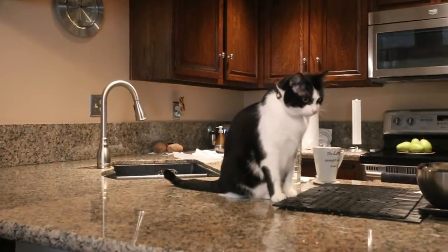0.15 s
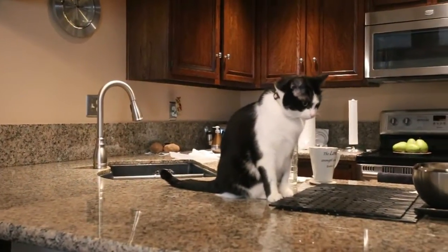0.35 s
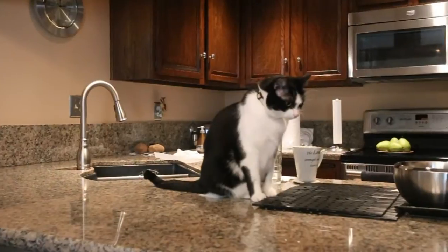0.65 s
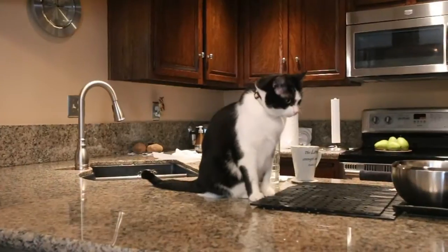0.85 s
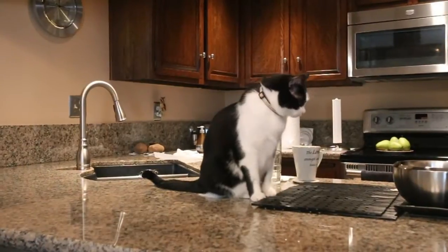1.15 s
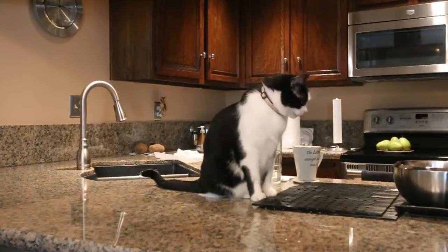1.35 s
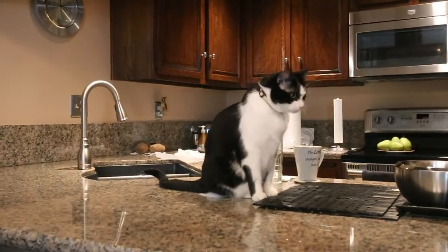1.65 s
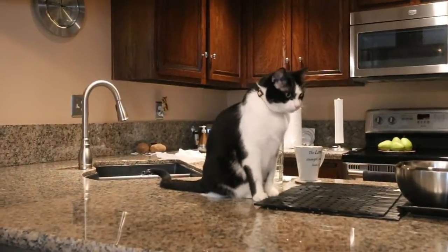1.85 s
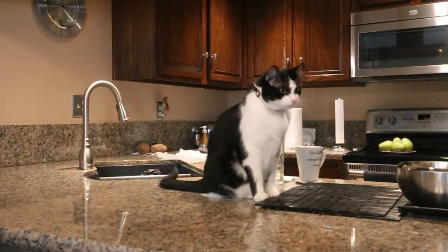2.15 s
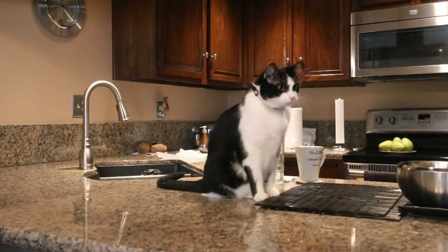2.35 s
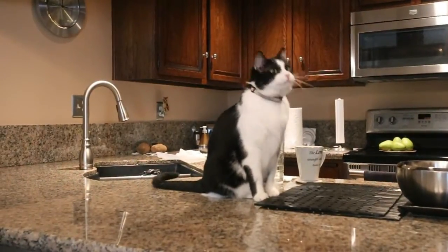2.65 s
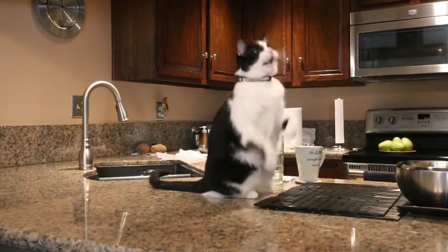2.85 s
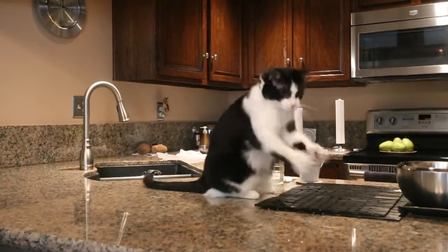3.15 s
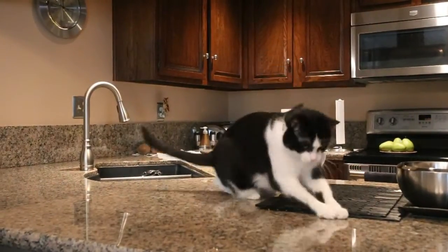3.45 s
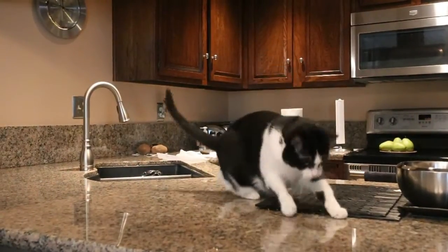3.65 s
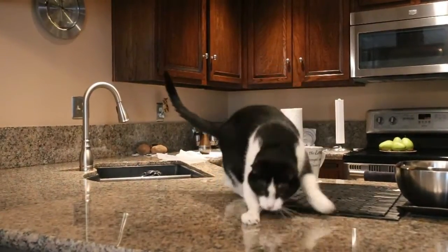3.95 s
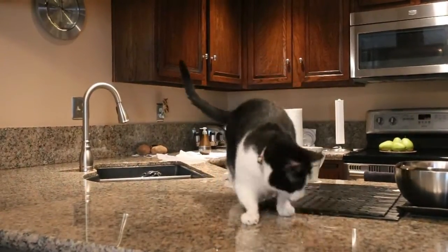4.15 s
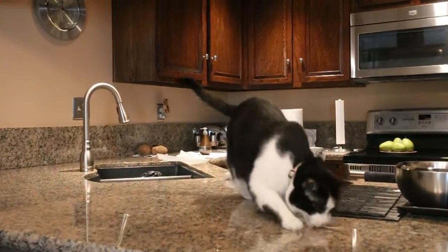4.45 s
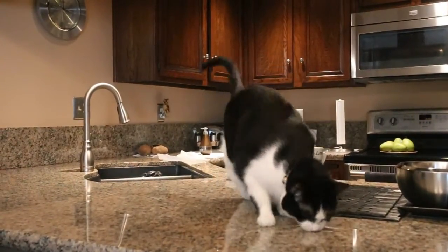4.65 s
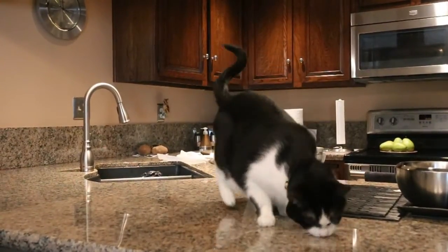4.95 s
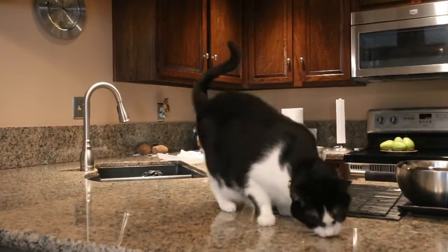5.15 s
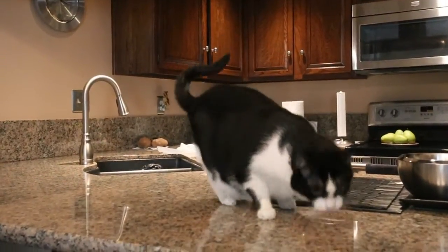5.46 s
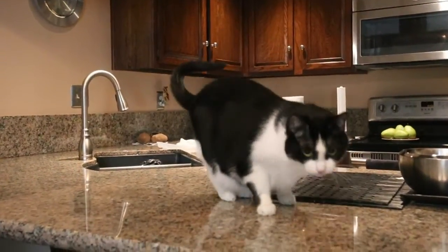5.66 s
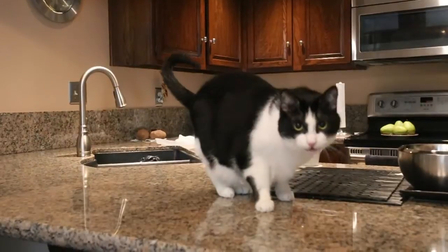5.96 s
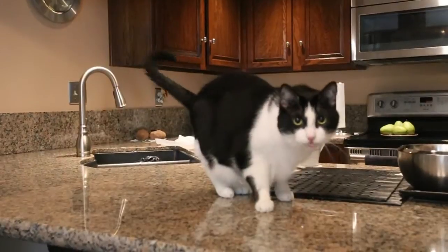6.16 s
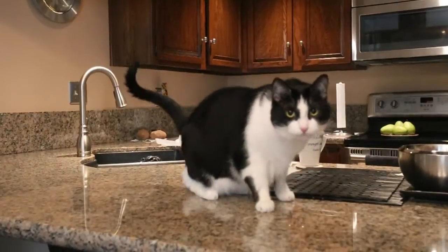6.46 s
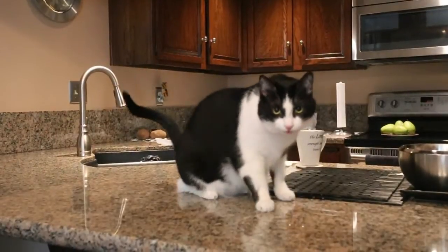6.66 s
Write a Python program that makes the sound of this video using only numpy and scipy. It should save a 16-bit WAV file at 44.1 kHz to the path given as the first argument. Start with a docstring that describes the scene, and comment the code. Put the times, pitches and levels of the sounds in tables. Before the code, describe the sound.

Distant, roomy clock ticks and tocks alternate steadily throughout. For three seconds almost nothing else is heard except faint brushing. Then a hard treat snaps on stone, sharp and far louder than everything, followed by tiny skitters and a second weaker click. Paws dully crunch a plastic mat, a low hum swells gently, and a collar tag tinks faintly. Close, dry counter sounds in a lively kitchen, with soft microphone hiss.

```python
"""Quiet kitchen: a pendulum wall clock ticks in a far corner, its struck case heard mostly by reflection.
On a stone counter, heard direct, a cat bats a hard treat: modes ring in two sharp clicks, short noise skitters.
The cat steps on a plastic mat, which crunches, and its collar tag tinks; both are banks of dying sines.
Shaped noise makes the soft brushes, room tone and microphone hiss; a low drone wavers and swells beneath.
"""
import sys
import numpy as np
from scipy import signal
from scipy.fft import rfft, irfft
from scipy.io import wavfile
from scipy.ndimage import uniform_filter1d

SR = 44100
rng = np.random.default_rng(int(sys.argv[2]) if len(sys.argv) > 2 else 0)


def convert_level_to_amplitude(level_db):
    """Map a level in decibels to its linear amplitude factor."""
    exponent = np.asarray(level_db, float) / 20
    return 10 ** exponent


def put_to_file(sound):
    """Save the sound as 16-bit audio at rate SR, in the file named by the first command-line argument."""
    columns = np.atleast_2d(sound).T  # one column per channel
    safe = np.clip(columns, -1, 1)
    whole_steps = np.round(safe * 32767)
    wavfile.write(sys.argv[1], SR, whole_steps.astype(np.int16))


N = 300756  # length in samples


def evened(x):
    """Scales to rms 1."""
    return x / np.sqrt(np.mean(x ** 2) + 1e-20)


def read(points, hz):
    """Reads a table on a log-frequency axis."""
    f, value = np.transpose(points)
    return np.interp(np.log(hz + 1), np.log(f + 1), value)


def add(mix, start_s, sound):
    """Mixes a sound in at start_s seconds."""
    part = mix[round(start_s * SR):][:len(sound)]
    part += sound[:len(part)]


def scaled_to_peak(sound, peak_db):
    """Scales a sound to the given peak level."""
    return convert_level_to_amplitude(peak_db) * sound / abs(sound).max()


def echoes(x, table):
    """Delayed copies, one for each path off a nearby surface."""
    return sum(convert_level_to_amplitude(level_db) * np.roll(x, round(delay_s * SR)) for delay_s, level_db in table)


def ring(hz, level_db, t60_s, rise_s):
    """Dying sines, one per mode, after a contact whose push builds up over rise_s."""
    t = np.arange(SR // 4)[:, None] / SR
    modes = convert_level_to_amplitude(level_db - 60 * t / t60_s) * np.sin(2 * np.pi * hz * t)
    signs = (-1.) ** np.arange(len(hz))  # neighbours start opposite, which fills the gaps between them
    return modes @ signs * (1 - np.exp(-t[:, 0] / rise_s))


def blows(events, modes, rise_s):
    """Each blow rings the modes, duller or brighter by its tilt, and more or less damped."""
    hz, level_db, t60_s = np.transpose(modes)
    octaves = np.log2(hz / hz[np.argmax(level_db)])  # from the strongest mode
    out = np.zeros(N)
    for start_s, peak_db, tilt_db, free_share in events:
        sound = ring(hz, level_db + tilt_db * octaves, t60_s * free_share, rise_s)
        add(out, start_s, scaled_to_peak(sound, peak_db))
    return out


def band_noise(size, hz, width_hz):
    """Slow complex noise shifted up to hz."""
    r = np.exp(-np.pi * width_hz / SR)
    white = rng.standard_normal((size, 2)) @ [1, 1j]
    slow = signal.lfilter([1], [1, -2 * r, r * r], white)
    carrier = np.exp(2j * np.pi * hz * np.arange(size) / SR)
    return evened((slow * carrier).real)


# how long the kitchen rings on: pitch_hz, t60_s
KITCHEN = [(500, 0.46), (2000, 0.6), (5500, 0.43), (14500, 0.25)]


def kitchen(x, gap_s, build_s):
    """Random reflections start after a gap, build up, and die band by band."""
    hz, t, z = signal.stft(rng.standard_normal(SR), SR, nperseg=256)
    fade = convert_level_to_amplitude(-60 * t / read(KITCHEN, hz)[:, None])
    tail = signal.istft(z * fade, SR, nperseg=256)[1]
    tail = tail * (1 - np.exp(-np.arange(len(tail)) / SR / build_s))
    tail = np.concatenate([np.zeros(round(gap_s * SR)), tail / np.linalg.norm(tail)])
    return signal.oaconvolve(x, tail)[:N]


# spectrum of room tone and microphone hiss, shape only: pitch_hz, level_db (per Hz, relative)
AIR = [(15, -42), (25, -12), (45, -12), (62, -1.5), (84, -11), (114, -0.5), (200, -6), (330, -8),
       (800, -12), (2100, -16), (4200, -21), (5400, -28.5), (7500, -28.5), (12500, -25), (16000, -28)]


def air():
    """Steady room tone and microphone hiss: white noise shaped in frequency."""
    shape = convert_level_to_amplitude(read(AIR, np.fft.rfftfreq(N, 1 / SR)))
    tone = irfft(rfft(rng.standard_normal(N)) * shape, N)
    return convert_level_to_amplitude(-57) * evened(tone)  # rms dB


DRONE_HZ, DRONE_WAVER_HZ = 110.2, 6.01  # centre pitch; rms waver
DRONE_DB, DRONE_FLUTTER_DB = -76.5, 3  # rms between swells, before flutter; most flutter either way
# times when the low drone swells: middle_s, length_s, rise_db
SWELLS = [(0.988, 0.18, 10), (3.805, 0.85, 13.5), (4.623, 0.24, 11), (5.081, 0.3, 18), (5.31, 0.15, 21),
          (5.508, 0.13, 16), (5.932, 0.78, 16)]


def drone():
    """A low sine that wavers in pitch, flutters in level and swells now and then."""
    t = np.arange(N) / SR
    bumps = [rise_db * np.clip(1 - (2 * (t - middle_s) / length_s) ** 4, 0, 1)
             for middle_s, length_s, rise_db in SWELLS]
    waver = evened(uniform_filter1d(rng.standard_normal(N), size=4000))
    flutter = evened(uniform_filter1d(rng.standard_normal(N), size=4000))
    level_db = DRONE_DB + np.max(bumps, axis=0) + DRONE_FLUTTER_DB * np.tanh(flutter)
    phase = 2 * np.pi * np.cumsum(DRONE_HZ + DRONE_WAVER_HZ * waver) / SR
    return convert_level_to_amplitude(level_db) * np.sqrt(2) * np.sin(phase)


FIRST_TICK_S, SWING_S, TOCK_AFTER_S = .0952, 1.3196, .639  # the escapement limps: the tock comes early
MODE_SCATTER_DB, PITCH_SCATTER = 1.5, .002  # rms per mode and beat; pitch as a share
# clock case modes, levels before the room: pitch_hz, tick_db, tock_db, t60_s
CASE = [(1605, -51.5, -54, 0.013), (1802, -56, -55.5, 0.041), (1920, -49, -52, .008),
        (2030, -52.5, -59, 0.0304), (2230, -55.5, -60, .008), (2420, -57.5, -54, 0.035),
        (3393, -57.5, -56, 0.017), (3583, -59.5, -57, 0.041), (4930, -78, -58.5, 0.014),
        (5225, -74, -59, 0.058), (5950, -67, -66, 0.013), (7600, -65, -61, 0.012)]
# no two beats fall quite alike, tick and tock in turn: level_db (added to the case modes)
STRENGTHS_DB = [-2, -1.8, -1.5, -0.55, -1, .1, 0.91, 1.3, -0.37, 1.5, .4]
# the clock hangs in a corner, direct sound and first strong reflections: delay_s, level_db
CORNER = [(0, -10), (.0047, -2.5), (.0083, 0.5), (0.0118, -4), (0.0172, 2.5), (.0194, -10), (.0277, -7.5),
          (0.031, -1), (.041, -20), (0.05, -6)]


def clock():
    """Ticks and tocks ring the same case modes with other strengths; reflections outweigh the direct path."""
    hz, tick_db, tock_db, t60_s = np.transpose(CASE)
    out = np.zeros(N)
    for beat, strength_db in enumerate(STRENGTHS_DB):
        is_tock = beat % 2
        start_s = FIRST_TICK_S + beat // 2 * SWING_S + is_tock * TOCK_AFTER_S
        level_scatter, pitch_scatter = rng.standard_normal((2, len(hz)))
        level_db = strength_db + (tock_db if is_tock else tick_db) + MODE_SCATTER_DB * level_scatter
        add(out, start_s, ring(hz * (1 + PITCH_SCATTER * pitch_scatter), level_db, t60_s, 0.00026))
    return convert_level_to_amplitude(5.5) * (echoes(out, CORNER) + convert_level_to_amplitude(-0.5) * kitchen(out, .02, 0.011))


# soft brushes and thuds: start_s, length_s, level_db (rms), centre_hz, width_hz
BRUSHES = [(.21, 0.062, -67, 4550, 4000), (1.14, 0.087, -63.5, 1495, 3040), (2.82, 0.21, -60.5, 1295, 1200),
           (2.852, 0.17, -60, 597, 700), (2.86, 0.15, -69.5, 8940, 4000), (3.337, 0.11, -50, 1800, 3000),
           (3.885, 0.1, -62.5, 491, 129), (3.885, 0.078, -55, 2520, 6000), (3.699, .1, -60, 3015, 4130),
           (4.69, 0.13, -59, 800, 930), (5.02, 0.64, -61, 330, 252), (5.15, 0.14, -63.5, 1187, 120),
           (5.26, 0.056, -64, 74.5, 40), (5.27, 0.078, -54.5, 298.4, 407), (5.274, 0.041, -56, 1300, 700),
           (5.943, .05, -56, 2484, 1510), (5.97, 0.16, -62, 1543, 350), (6.68, 0.21, -68.5, 1437, 299)]


def brushes():
    """Puffs of band noise with a quick start and a slower end."""
    out = np.zeros(N)
    for start_s, length_s, level_db, centre_hz, width_hz in BRUSHES:
        u = np.linspace(0, 1, round(length_s * SR))
        puff = evened(u ** 0.2 * (1 - u))
        add(out, start_s, convert_level_to_amplitude(level_db) * puff * band_noise(len(u), centre_hz, width_hz))
    return out


GRIT_T60_S = .0015
CLICK_WIDTH_SHARE, CLICK_SNAP_DB = 0.63, -20.5  # resonance width over its centre; uncoloured snap under it
# small dry clicks of treat, claws and teeth: start_s, peak_db, centre_hz
CLICKS = [(1.15, -48, 3600), (1.432, -49, 5500), (1.478, -49, 7550), (2.223, -49, 5500), (2.892, -39, 8600),
          (3.015, -37.5, 10800), (3.34, -22, 3600), (3.477, -37, 4200), (3.702, -40, 8900),
          (3.713, -40, 4040), (3.727, -42.5, 4000), (3.763, -40, 10200), (3.77, -43, 9000),
          (3.822, -42, 9050), (3.882, -30.5, 11500), (4.021, -41, 9400), (4.08, -38, 11000),
          (4.25, -38, 9700), (4.302, -42, 9900), (4.340, -41.5, 9600), (4.63, -51, 6080),
          (4.683, -39, 6600), (4.723, -41, 7400), (4.741, -44, 8000), (4.909, -47, 8160),
          (4.944, -39.5, 8100), (5.002, -39, 8200), (5.005, -34, 8060), (5.008, -36, 8800),
          (5.121, -36.5, 9100), (5.124, -39, 4970), (5.138, -41, 9500), (5.171, -38, 6100),
          (5.234, -39, 8700), (5.275, -50, 5000), (5.407, -47, 8000), (5.433, -40, 12000),
          (5.949, -48, 7000), (5.990, -43, 9500), (6.399, -50, 8000), (6.67, -44, 8010)]


def clicks():
    """Each is a quickly dying burst of noise, coloured by one broad resonance."""
    out, t = np.zeros(N), np.arange(256) / SR
    for start_s, peak_db, hz in CLICKS:
        grit = rng.standard_normal(256) * convert_level_to_amplitude(-60 * t / GRIT_T60_S)
        snap = signal.lfilter([1, 0, -1], [1], grit)
        r = np.exp(-np.pi * CLICK_WIDTH_SHARE * hz / SR)
        pole = [1, -2 * r * np.cos(2 * np.pi * hz / SR), r * r]
        coloured = signal.lfilter([1], np.convolve(pole, pole), snap)
        sound = evened(coloured) + convert_level_to_amplitude(CLICK_SNAP_DB) * evened(snap)
        add(out, start_s, scaled_to_peak(sound, peak_db))
    return out


# modes of a small hard part, perhaps the collar buckle: pitch_hz, level_db (relative), t60_s
BUCKLE = [(4300, -3, 0.0049), (8300, -5, .002)]
# its taps: start_s, peak_db, tilt_db (per octave), free_share (of the ring time)
TAPS = [(3.102, -41.5, -3, 1), (4.398, -44.5, 6, 1), (6.385, -44.5, -4, 1)]


def buckle_taps():
    """Two short modes of a small hard part ring at each tap."""
    return blows(TAPS, BUCKLE, .0001)


CONTACT_S, CONTACT_DB = .00005, -11  # the landing's own short push, against the peak of the ring
# hard treat on stone, modes: pitch_hz, flat_db (relative), edge_db (relative), t60_s
TREAT = [(2430, -25, -17, 0.0083), (2880, -22.5, -15.5, 0.0053), (3700, -20, -9, 0.012),
         (4310, -6, 2, 0.0021), (5500, -9.5, -0.5, 0.00408), (6100, -9.5, -7.5, .003),
         (6880, -7.5, -9, 0.0071), (7450, -8.5, -6.5, 0.0047), (8410, -2, -3.5, 0.00403),
         (9080, -1.5, -1, 0.0024), (9920, 4, 2, 0.0033), (11150, -2, 2, 0.0014), (11900, -4.5, -2, 0.0042),
         (12800, -13, -6, 0.0023), (14030, -19, -17, .002), (15000, -22, -19, .002)]
# treat landings: start_s, peak_db (of the ring alone), side (1 flat, 2 edge)
LANDINGS = [(3.2731, 0, 1), (4.0498, -14, 2)]


def treat():
    """The treat rings its modes with the strengths of the side it lands on, over the short push of contact."""
    modes, out = np.transpose(TREAT), np.zeros(N)
    u = np.arange(64) / SR / CONTACT_S
    push = (1 - 0.82 * u) * np.exp(-u)
    for start_s, peak_db, side in LANDINGS:
        sound = ring(modes[0], modes[side], modes[3], 0.00006)
        add(out, start_s, scaled_to_peak(sound, peak_db))
        add(out, start_s, convert_level_to_amplitude(peak_db + CONTACT_DB) * push)
    return out


# plastic mat modes: pitch_hz, level_db (relative), t60_s (ringing free)
MAT = [(1126, -8, 0.032), (1590, -9, 0.019), (2026, 5.5, 0.028), (2330, -4, 0.035), (2540, 0, 0.02),
       (3600, 9, 0.0052)]
# paw on the mat: start_s, peak_db, tilt_db (per octave), free_share (of the ring time left under the paw)
STEPS = [(4.021, -51.5, 0, 0.5), (4.6284, -49, -4, .3), (4.6828, -33, -1, 0.28), (4.9442, -45, 7, .4),
         (5.001, -40.5, -9, 0.9), (5.0058, -29, -7, 0.55), (5.2744, -47, -9, 0.21),
         (5.6092, -48.5, -4, 0.44), (5.9438, -38.5, 0, 0.35), (5.955, -47, 2, 0.5), (5.968, -44, 8, 0.34)]


def mat_steps():
    """Each step crunches the mat, ringing modes that the paw itself damps."""
    return blows(STEPS, MAT, 0.0002)


# collar tag modes: pitch_hz, level_db (relative), t60_s (ringing free)
TAG = [(6220, 1, 0.033), (6400, -3, 0.062), (6750, -6, 0.029), (7170, -5, .02), (10100, -7.5, 0.051)]
# its tinks: start_s, peak_db, tilt_db (per octave), free_share (of the ring time)
TINKS = [(5.7044, -53, 2, 1), (5.77, -56, .1, 1), (5.83, -59, .1, 1), (5.9269, -55, .1, 0.69),
         (6.6563, -42, -6, 0.65)]


def tag_tinks():
    """The collar tag rings its high modes at each tink."""
    return blows(TINKS, TAG, 0.00027)


# echoes off stone, mat and cabinets: delay_s, level_db
COUNTER = [(.0006, -23), (.0012, -8.5), (.0098, -9), (0.0145, -10)]


def scene():
    """Counter sounds come direct, with quick echoes and the room behind; the mat stirs the room less."""
    hard = treat() + clicks() + tag_tinks() + buckle_taps()
    steps = mat_steps()
    near = hard + steps + echoes(hard + steps, COUNTER)
    room = convert_level_to_amplitude(-2.0) * kitchen(hard + convert_level_to_amplitude(-0.2) * steps, 0.002, 0.0034)
    mix = near + room + clock() + brushes() + air() + drone()
    return mix[None]


def top_cut(x):
    """Nothing passes above the cut-off."""
    return signal.sosfilt(signal.butter(12, 16500, fs=SR, output="sos"), x)


def record(dry):
    """A limiter ducks everything just after a loud click and recovers; a low-pass then trims the top."""
    power_db = 10 * np.log10(abs(uniform_filter1d(dry[0] ** 2, 60)) + 1e-12)
    fall_db = np.arange(N) * 49.8 / SR  # the held level falls 49.8 dB a second
    held_db = np.maximum.accumulate(power_db + fall_db) - fall_db
    over_db = np.maximum(held_db + 18.5, 0)  # threshold -18.5 dB
    late_db = signal.lfilter([.01], [1, -.99], over_db)  # the limiter lags, so the click itself gets through
    limited = dry / convert_level_to_amplitude(0.36 * late_db)
    low_pass = signal.firwin(255, 15900, fs=SR)
    mix = signal.oaconvolve(limited, low_pass[None], "same")
    return top_cut(mix)


dry = scene()
out = record(dry)
put_to_file(out)
```